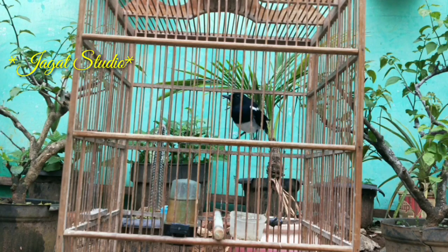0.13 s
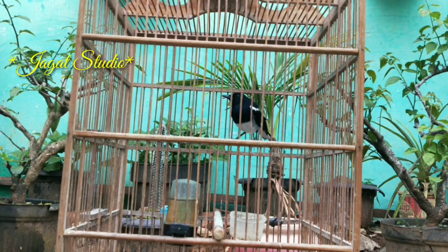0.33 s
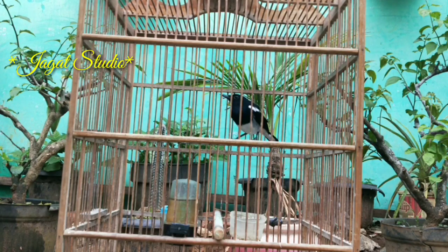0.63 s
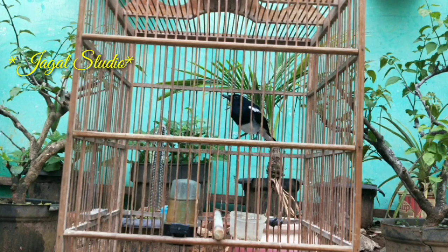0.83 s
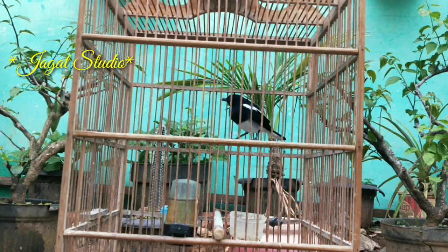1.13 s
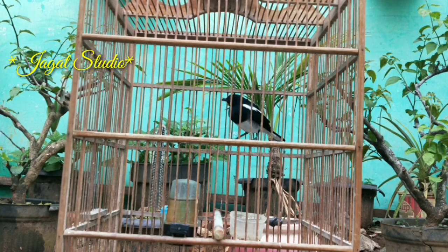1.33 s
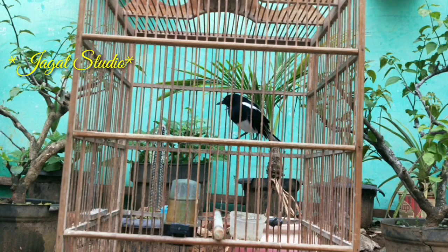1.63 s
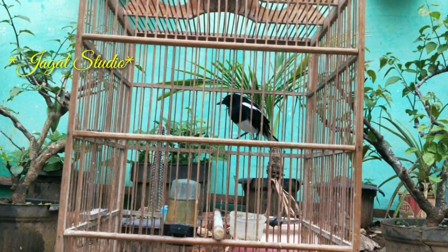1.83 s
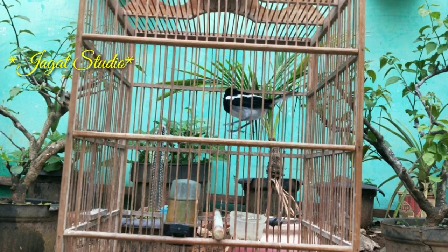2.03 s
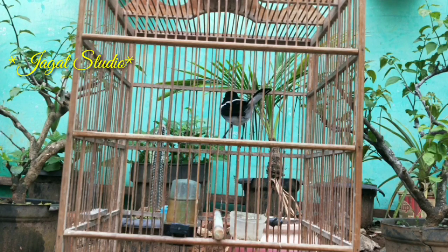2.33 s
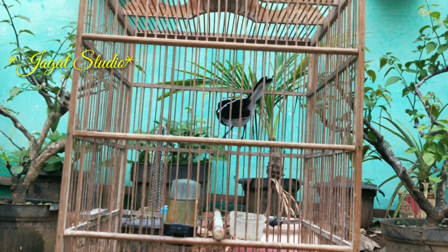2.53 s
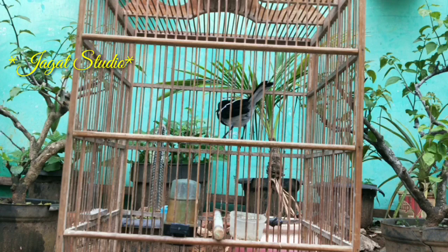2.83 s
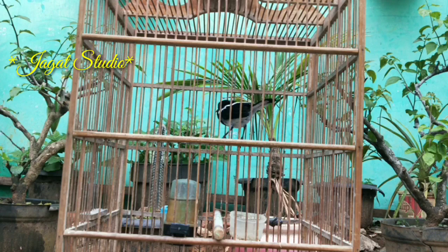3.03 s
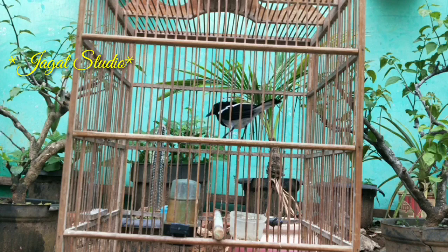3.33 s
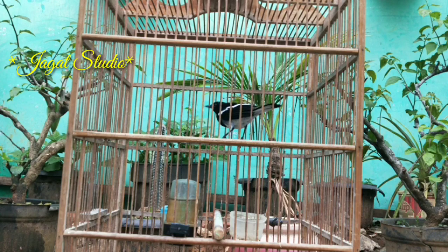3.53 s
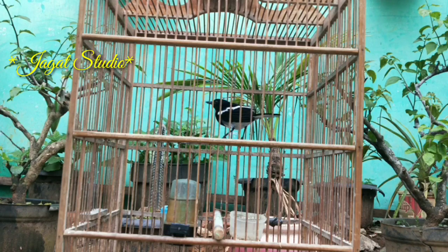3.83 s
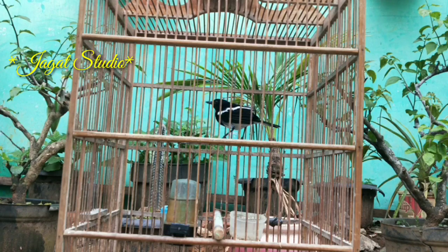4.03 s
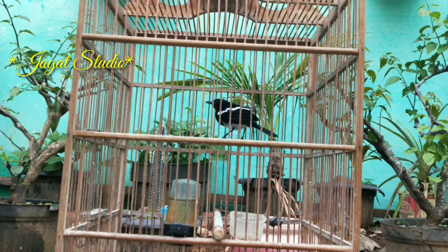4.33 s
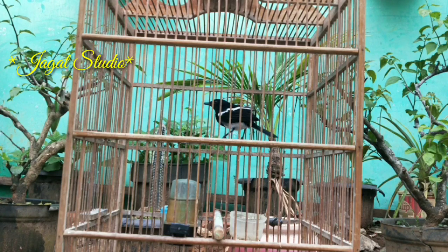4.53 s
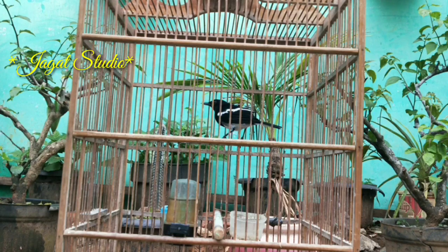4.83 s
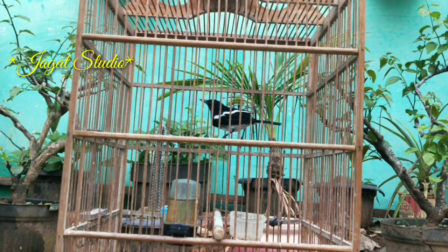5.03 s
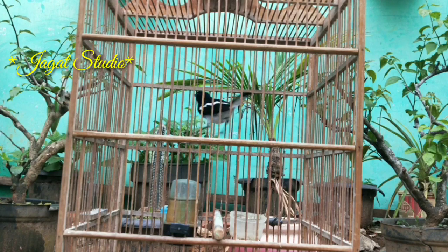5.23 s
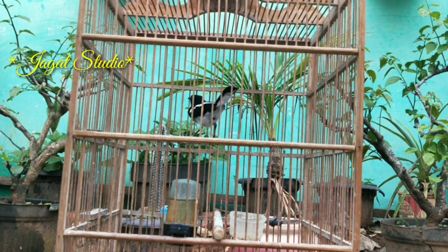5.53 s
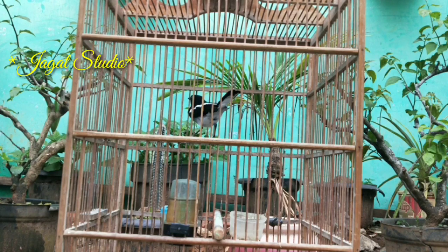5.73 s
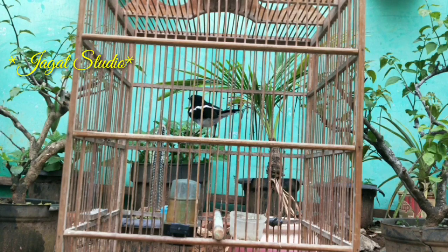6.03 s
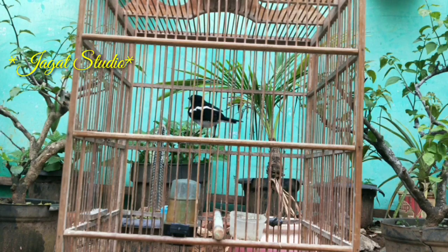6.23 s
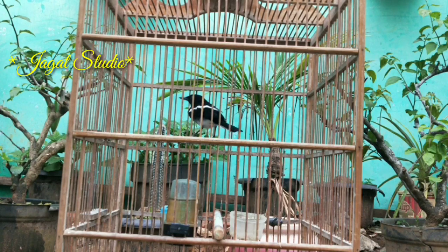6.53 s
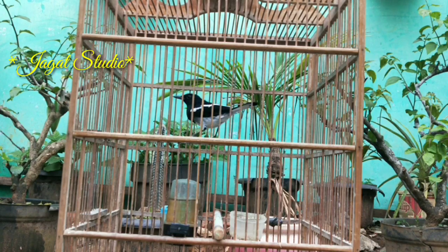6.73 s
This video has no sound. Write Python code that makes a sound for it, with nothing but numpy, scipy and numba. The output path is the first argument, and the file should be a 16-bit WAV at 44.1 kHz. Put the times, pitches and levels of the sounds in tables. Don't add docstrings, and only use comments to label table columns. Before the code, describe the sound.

A caged songbird whistles, trills and chatters loudly close by in an echoing walled yard, while low traffic rumble swells in the gaps.

```python
import sys
import numpy as np
from scipy import signal
from scipy.fft import rfft, irfft
from scipy.io import wavfile
from scipy.ndimage import uniform_filter1d, minimum_filter1d
from numba import njit

SR = 44100
rng = np.random.default_rng(int(sys.argv[2]) if len(sys.argv) > 2 else 0)


def to_wav(s):
    ch = np.atleast_2d(s).T
    pcm = np.round(np.clip(ch, -1, 1) * 32767)
    wavfile.write(sys.argv[1], SR, pcm.astype(np.int16))


def rack_gain(trim_db):
    fader = np.asarray(trim_db, float)
    return 10 ** (fader / 20)


N = 303408

# start t/s, end t/s, beat f/Hz, depth/0-1
BUZZ = [
    (.598, .672, 430, .75),
    (.928, .968, 300, .6),
    (1.662, 1.79, 575, .35),
    (2.558, 2.6, 700, .08),
    (6.575, 6.63, 520, .18),
    (5.26, 5.4, 750, .05),
    (5.52, 5.66, 750, .04),
    (5.8, 5.93, 750, .04),
]
# t/s, level/dB
EFFORT = [(.9, -2.5), (1.05, 0), (1.3, -0.5), (1.5, 0.5), (2.04, -1), (2.58, 1), (2.73, 0), (4.05, 1),
          (4.22, -2.5), (4.4, -0.5), (4.79, 2.5), (5.07, 2.5), (5.35, -3), (5.9, 0.5), (6.33, 0.5),
          (6.58, 1), (6.7, 3), (6.82, 2)]
BUZZ_ABOVE_HZ = 2000
WAVER_HZ, FLUTTER_DB, PATCHY_DB, BREATH_DB = 22, 1.0, 4, -27.5
SECOND_DB_PER_KHZ, THIRD_DB = -11.5, -42.5
WIDEN_S = .16
SMEAR = .7


def bird():
    out, clock = np.zeros(N), np.arange(N) / SR
    waver, breath, flutter, patchy = slow(270), slow(1500), slow(400), slow(46)
    beat = beating(clock, waver, breath)
    for note, shape, (level_db, second_db, trill_hz, depth_hz, crest_s) in song():
        start, length, first_hz = note[:3]
        span = slice(int(start * SR), min(int((start + length + 0.0011) * SR), N))
        t, air = clock[span], breath[span]
        hz, shape_db = glide(t, note, **shape)

        turn = 2 * np.pi * trill_hz * (t - start - crest_s)
        widen = 1 if length < WIDEN_S else 0.3 + 1.05 * (t - start) / length
        trill = widen * (np.cos(turn) + 0.3 * np.cos(2 * turn) - 0.05 * np.sin(2 * turn))
        spin = np.exp(2j * np.pi * np.cumsum(hz + depth_hz * trill + WAVER_HZ * waver[span]) / SR)

        second_db = second_db + SECOND_DB_PER_KHZ * (hz - 2500) / 1000 + PATCHY_DB * patchy[span]
        third = rack_gain(THIRD_DB) + rack_gain(second_db - 29.5)
        upper = rack_gain(second_db) * spin ** 2
        upper += third * (spin ** 3 + .3 * spin ** 4) * (1 + SMEAR * air)
        tone = spin + upper * (1 + 0.067 * air)
        buzz = beat[span] if note[3] > BUZZ_ABOVE_HZ else 1

        edge = np.clip(np.minimum(t - t[0], t[-1] - t) / 0.003, 0, 1)
        swell = 1 + depth_hz * (0.00079 * np.cos(turn) + 0.001 * np.sin(turn)) + rack_gain(BREATH_DB) * air
        effort_db = np.interp(start, *np.transpose(EFFORT))
        loudness = np.sqrt(2) * rack_gain(level_db + shape_db + FLUTTER_DB * flutter[span] + effort_db)
        out[span] += loudness * edge * swell * (buzz * tone).imag
    return out


def beating(clock, waver, breath):
    beat = np.ones(N, complex)
    for start, end, hz, depth in BUZZ:
        on = np.clip(np.minimum(clock - start, end - clock) / .005, 0, 1)
        wobble = 1 + (0.023 + .2 * depth ** 2) * waver
        up = np.exp(2j * np.pi * np.cumsum(hz * wobble) / SR)
        above = 0.55 * up + 0.21 * up ** 2 + 0.23 * up ** 3 + 0.047 * up ** 4
        below = 1.1 / up + 0.19 / up ** 2
        beat += on * depth * (above + below + 0.33 * breath)
    return beat


# start t/s, length t/s, first f/Hz, turn f/Hz, last f/Hz
WHOOPS = [(.04, .108, 845, 1223, 1126), (.29, .105, 875, 1226, 1125)]
SLIDES = [(5.243, 0.19, 4353, 3545, 2204), (5.498, 0.2, 4410, 3432, 2304), (5.783, .218, 4410, 3400, 2478),
          (6.117, .194, 4420, 3435, 2566)]
HOOKS = [(2.558, 0.065, 2914, 3180, 2346), (2.704, 0.053, 1500, 2212, 1812), (4.73, .122, 1910, 3647, 2453)]
ARCHES = [(4.925, .07, 1638, 2293, 1636), (6.667, .06, 1573, 2370, 1843)]
PEAKS_UP = [(5.027, .103, 2250, 2838, 1373)]
ROOF = [(4.313, .203, 1600, 2460, 1798)]
FLICKS = [(1.287, .08, 1892, 3170, 2484), (1.445, .08, 2153, 2132, 1822)]
STROKES = [(.962, 0.056, 2400, 2420, 2500), (2.031, 0.029, 2880, 3060, 3270),
           (4.18, .085, 2040, 2440, 2480), (6.78, .083, 2050, 2750, 3250), (6.562, .032, 4500, 3500, 2550),
           (6.575, .055, 3600, 2900, 2400), (6.59, 0.04, 2900, 3150, 3290), (.927, 0.053, 2600, 2700, 2650)]
LOWS = [(1.022, 0.059, 1750, 1580, 1620), (1.382, .063, 1700, 1760, 1800), (1.278, 0.014, 2900, 2200, 1950)]
UPPER_VOICE = [(3.073, 0.11, 3586, 4277, 4700)]
LOWER_VOICE = [(3.075, .127, 3053, 3214, 3876)]
LAST_WHOOP = [(.548, .095, 968, 1173, 1187)]
STEPS = [(4.012, .074, 2562, 2769, 2980), (4.084, .047, 2805, 2720, 2930)]
SWOOP = [(6.283, .097, 1700, 2922, 1884)]
ASIDES = [(6.29, .035, 3260, 3635, 4590)]
FAR_BIRD = [(0, .21, 3850, 3850, 3850)]
TRILLS = [(.602, 0.076, 2613, 2748, 2320), (0.669, 0.092, 1912, 1708, 1530),
          (1.071, 0.077, 1756, 1816, 1865), (1.142, 0.051, 2066, 2345, 2470),
          (1.662, .125, 2704, 2938, 2906), (1.791, 0.067, 2093, 1992, 1795)]
LONG_TRILLS = [(2.055, .222, 2795, 2623, 2130), (3.19, .272, 4560, 4152, 3395)]
# level/dB, second partial level/dB, rate f/Hz, depth f/Hz, first crest t/s
WARBLE = [(10, -38.5, 55, 180, .011), (8.5, -22, 46, 170, 0.021), (14.5, -33, 92.5, 130, .005),
          (17, -32, 59.5, 172, .012), (13, -44.5, 45, 170, .004), (7, -33, 48, 200, 0.0012)]
LONG_WARBLE = [(18, -37.5, 35, 200, .022), (11.8, -22.5, 30, 150, .006)]
TRILL_SHAPE = dict(turn=0.62, ease=1.3, bend=1.1, rise_s=0.0099, fall_s=0.011, fade_db=4, low_db=4.2)
LONG_SHAPE = dict(turn=.45, ease=1.1, bend=1.2, rise_s=0.0036, fall_s=0.037, fade_db=5, low_db=0.2)
ROUND = 2.1
KINDS = [
    (WHOOPS, dict(turn=.68, ease=1.8, bend=.8, rise_s=0.033, fall_s=0.0074, fade_db=1, low_db=13), (-1, -34.5, 0, 0, 0)),
    (SLIDES, dict(turn=.1, ease=1.8, bend=1.35, rise_s=0.017, fall_s=0.015, fade_db=2.5, low_db=1.05), (17.5, -42.5, 91, 69, 0.3)),
    (HOOKS, dict(turn=.25, ease=3.5, bend=1.6, rise_s=0.017, fall_s=.012, fade_db=0.2, low_db=5), (15.5, -35.5, 0, 0, 0)),
    (ARCHES, dict(turn=.44, ease=ROUND, bend=ROUND, rise_s=0.0088, fall_s=0.0064, fade_db=2.5, low_db=21.5), (13, -42, 0, 0, 0)),
    (PEAKS_UP, dict(turn=.5, ease=1.1, bend=1.1, rise_s=.008, fall_s=.008, fade_db=-7.5, low_db=14), (14, -42, 0, 0, 0)),
    (ROOF, dict(turn=.45, ease=1.15, bend=.9, rise_s=.008, fall_s=.008, fade_db=-4, low_db=10), (15, -35, 70, 40, .005)),
    (FLICKS, dict(turn=.26, ease=1.1, bend=.55, rise_s=.005, fall_s=0.0094, fade_db=.1, low_db=3), (14.5, -38.5, 0, -0.5, 0)),
    (STROKES, dict(turn=0.54, ease=1.2, bend=0.62, rise_s=.007, fall_s=.006, fade_db=0.8, low_db=9.5), (16.5, -36, 0, 0, 0)),
]
SOFT_KINDS = [
    (LOWS, dict(turn=0.43, ease=1.5, bend=1.1, rise_s=0.015, fall_s=0.012, fade_db=0, low_db=0.5), (7, -21, 0, 2, 0)),
    (UPPER_VOICE, dict(turn=.17, ease=1.6, bend=7.3, rise_s=0.011, fall_s=0.002, fade_db=-8.5, low_db=-1.5), (-1.5, -42.5, 0, 0, 0)),
    (LOWER_VOICE, dict(turn=.75, ease=3.0, bend=.7, rise_s=0.0036, fall_s=0.012, fade_db=3, low_db=1), (16, -46, 0, -2, 0)),
    (LAST_WHOOP, dict(turn=.6, ease=1.6, bend=1.1, rise_s=0.022, fall_s=.01, fade_db=-14, low_db=8), (-9.5, -36.5, 0, 1.5, 0)),
    (STEPS, dict(turn=0.38, ease=1.1, bend=1.1, rise_s=0.011, fall_s=0.0039, fade_db=-1.7, low_db=3.8), (15.5, -37, 75.5, 25, .006)),
    (SWOOP, dict(turn=.56, ease=0.41, bend=1.5, rise_s=0.01, fall_s=0.0054, fade_db=-5, low_db=16.5), (13.5, -42, 0, -1, 0)),
    (ASIDES, dict(turn=0.31, ease=0.99, bend=0.77, rise_s=.005, fall_s=0.0042, fade_db=4.5, low_db=-2), (-3, -38, 0, 0.5, 0)),
    (FAR_BIRD, dict(turn=.45, ease=1.1, bend=1.1, rise_s=.01, fall_s=.03, fade_db=-4.8, low_db=.1), (-49.5, -48, 0, -2, 0)),
]


def song():
    plain = [(note, shape, voice) for notes, shape, voice in KINDS + SOFT_KINDS for note in notes]
    trills = [(note, TRILL_SHAPE, voice) for note, voice in zip(TRILLS, WARBLE)]
    return plain + trills + [(note, LONG_SHAPE, voice) for note, voice in zip(LONG_TRILLS, LONG_WARBLE)]


EDGE_DB = -23


def glide(t, note, turn, ease, bend, rise_s, fall_s, fade_db, low_db):
    start, length, first, middle, last = note
    u = np.clip((t - start) / length, 0, 1)
    before = np.clip(1 - u / turn, 0, 1)
    after = np.clip((u - turn) / (1 - turn), 0, 1)
    hz = middle + (first - middle) * before ** ease + (last - middle) * after ** bend
    rise = np.clip(1 - u * length / rise_s, 0, 1) ** 2
    fall = np.clip(1 - (1 - u) * length / fall_s, 0, 1) ** 2
    return hz, EDGE_DB * (rise + fall) - fade_db * u - low_db * (hz.max() - hz) / 1000


# t/s, top f/Hz, level/dB, partials level/dB
CHIPS = [(3.235, 3750, 3.5, -33), (3.274, 3890, 11, -34.5), (3.307, 3080, 6.5, -21),
         (3.344, 3050, 7.5, -19.5), (3.368, 2704, 1.5, -4.5), (3.401, 2730, -0.5, -3.5),
         (3.429, 2397, -4, 7)]
CHIP_S, CHIP_FALL = 0.012, 0.22


def chips():
    out, t = np.zeros(N), np.arange(int(CHIP_S * SR)) / SR
    swell = np.sin(np.pi * t / CHIP_S) ** 0.82
    for start, hz, db, partials_db in CHIPS:
        phase = 2 * np.pi * np.cumsum(hz * (1 - CHIP_FALL * t / CHIP_S)) / SR
        tone = np.sin(phase) + rack_gain(partials_db) * (np.sin(2 * phase) + 0.2 * np.sin(3 * phase))
        first = int(start * SR)
        out[first:first + len(t)] += rack_gain(db) * swell * tone
    return out


# delay t/s, level/dB
NEAR = [(.0021, -29), (.0063, -14.5), (.018, -22.5), (.034, -34)]
# t/s, slap level/dB
FACING = [(0, -4), (.4, -2.5), (.57, -12), (.63, -3.5), (.72, 14.5), (.95, -1.5), (1.1, 3), (1.45, 1.5),
          (1.72, -12.5), (1.83, 11.5), (2.1, -6.5), (2.7, -12), (3.1, -4.5), (4.8, -6), (5.1, 4),
          (5.6, -11), (6.2, 0), (6.34, -6), (6.6, -0.5)]
HALO_DB, HALO_T60_S = -13.5, 0.27
SLAP_S, SLAP_DB, SLAP_TOP_HZ, SLAP_AGAIN_DB = .2534, -15.5, 6800, -27
YARD_DB, YARD_T60_S, YARD_TOP_HZ, YARD_LOW_HZ = -17.5, 1.5, 3970, 1500


def yard(x):
    near = x + sum(rack_gain(db) * late(x, s) for s, db in NEAR)
    near = near + scatter(x, HALO_DB, HALO_T60_S, 4500)
    toward = near * rack_gain(np.interp(np.arange(N) / SR, *np.transpose(FACING)))
    slap = rack_gain(SLAP_DB) * low(late(toward, SLAP_S), SLAP_TOP_HZ, order=2)
    again = rack_gain(SLAP_AGAIN_DB) * late(slap, SLAP_S)
    thin = x - 1.2 * low(x, YARD_LOW_HZ, order=1)
    return near + slap + again + scatter(thin, YARD_DB, YARD_T60_S, YARD_TOP_HZ)


def scatter(x, db, t60_s, top_hz):
    t = np.arange(2 * SR) / SR
    tail = rng.standard_normal(len(t)) * rack_gain(-60 * t / t60_s) * (1 - np.exp(-t / 0.0038))
    tail = low(tail / np.sqrt(np.sum(tail ** 2)), top_hz, order=4)
    return rack_gain(db) * signal.fftconvolve(x, tail)[:N]


# f/Hz, level/dB
TRAFFIC = [(30, -11.5), (81, 5.5), (169, -5), (563, -17.5), (1550, -23.5), (3170, -23.5), (4400, -46.5),
           (10200, -110)]
# t/s, level/dB
PASSING = [(0, -33), (.5, -28), (.8, -17), (1.5, -23.5), (2.1, -25.5), (2.4, -20), (3.001, -13.5),
           (3.248, -14.5), (3.55, -1), (3.9, 6), (4.301, -6), (4.648, 1), (5.2, -1), (5.8, -17.5),
           (6.302, -21.5), (6.5, -10), (6.88, -18.5)]
GUST_DB = 2


def traffic():
    f = np.maximum(np.arange(N // 2 + 1) * SR / N, 1)
    hz, db = np.transpose(TRAFFIC)
    colour = rack_gain(np.interp(np.log(f), np.log(hz), db))
    colour *= f ** 2 / (f ** 2 + 28.0 ** 2)
    out = np.zeros(N)
    for octave in np.arange(5, 14):
        share = np.cos(np.pi / 2 * np.clip(np.log2(f) - octave, -1, 1))
        flicker = rack_gain(2.5 * slow(9))
        out += flicker * irfft(rfft(rng.standard_normal(N)) * colour * share, N)
    passing = rack_gain(np.interp(np.arange(N) / SR, *np.transpose(PASSING)))
    return out / out.std() * rack_gain(GUST_DB * slow(5.4)) * passing


HUM_HZ, HUM_DB, HUM_END_S = 39, -19, 0.65


def hum():
    t = np.arange(N) / SR
    stop = 1 + np.exp(np.clip((t - HUM_END_S) / 0.018, -50, 50))
    fade = rack_gain(HUM_DB - 12 * t / HUM_END_S) / stop
    return fade * np.sin(2 * np.pi * np.cumsum(HUM_HZ + 3 * slow(6.8)) / SR)


def slow(rate_hz):
    size = int(SR / rate_hz)
    x = uniform_filter1d(uniform_filter1d(rng.standard_normal(N), size), size)
    return x / x.std()


def late(x, s):
    k = int(s * SR)
    return np.concatenate([np.zeros(k), x[:N - k]])


def low(x, hz, order):
    return signal.sosfilt(signal.butter(order, hz, fs=SR, output="sos"), x)


@njit
def follow(x, rise, fall):
    y, e = np.empty(len(x)), x[0]
    for i in range(len(x)):
        e += (x[i] - e) * (rise if x[i] > e else fall)
        y[i] = e
    return y


def scene():
    return (yard(bird() + chips()) + traffic())[None]


def low_pass(x):
    return signal.sosfilt(signal.butter(12, 15800, fs=SR, output="sos"), x)


TOP_DB, RATIO, ATTACK_S, RELEASE_S, AHEAD_S = -18, 2.953, 0.0035, 0.043, 0.011
GRIT_DB, GRIT_HZ = -46, 14000


def record(dry):
    size = int(AHEAD_S * SR)
    peak = -minimum_filter1d(-np.abs(dry[0]), size=size, origin=-(size // 2))
    heard = follow(peak, 1 / (ATTACK_S * SR), 1 / (RELEASE_S * SR))
    gain = np.minimum(rack_gain(TOP_DB) / (heard + 1e-9), 1) ** (1 - 1 / RATIO)
    x = dry * gain * rack_gain(1.5) + hum()
    x = x / (1 + np.abs(x / 0.94) ** 2.16) ** (1 / 7.5)
    x = x * (1 + rack_gain(GRIT_DB) * (x / 0.4) ** 2 * slow(GRIT_HZ))
    return low_pass(x)


dry = scene()
out = record(dry)
to_wav(out)
```